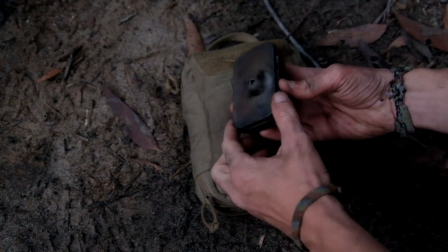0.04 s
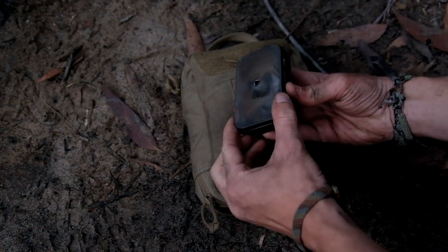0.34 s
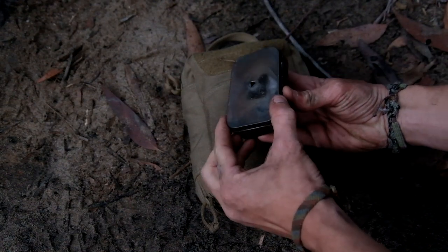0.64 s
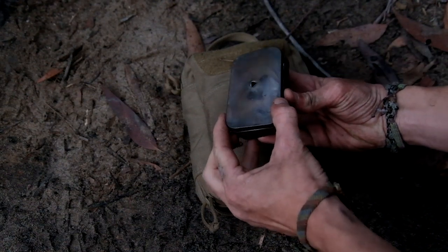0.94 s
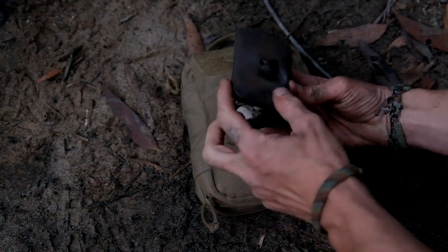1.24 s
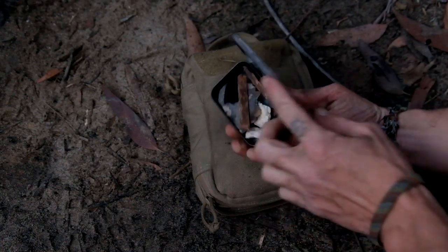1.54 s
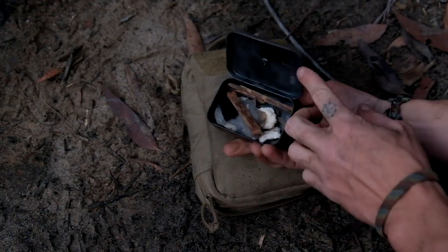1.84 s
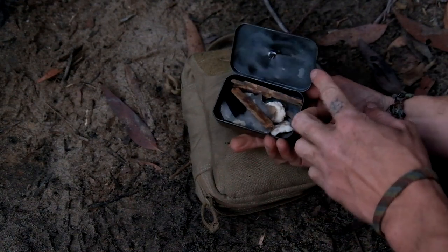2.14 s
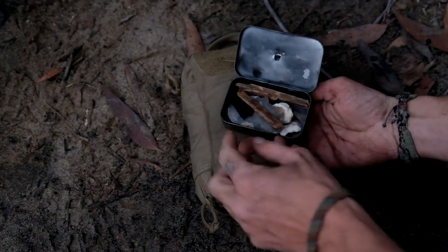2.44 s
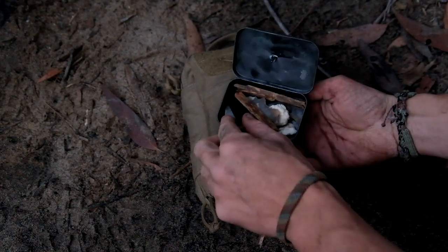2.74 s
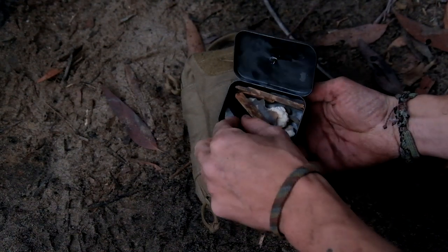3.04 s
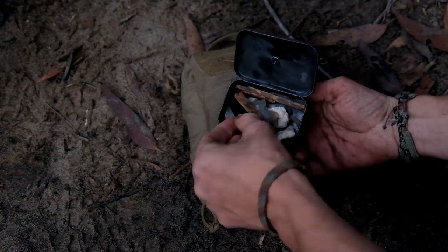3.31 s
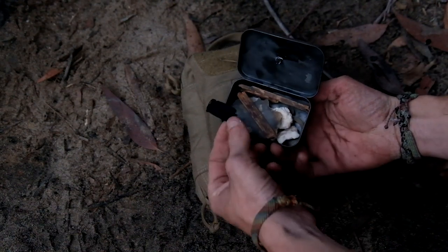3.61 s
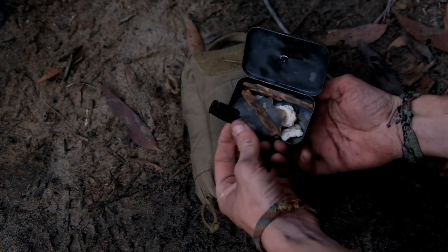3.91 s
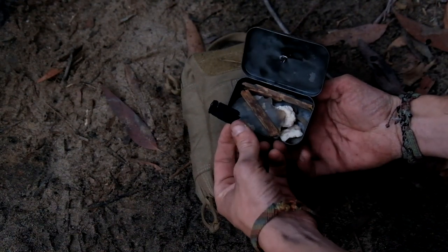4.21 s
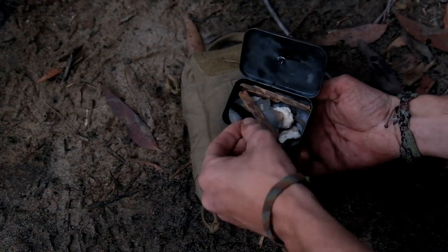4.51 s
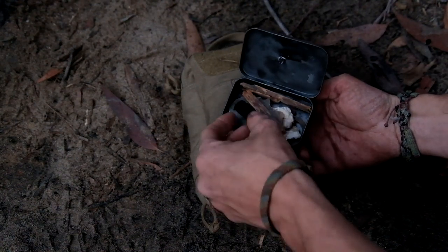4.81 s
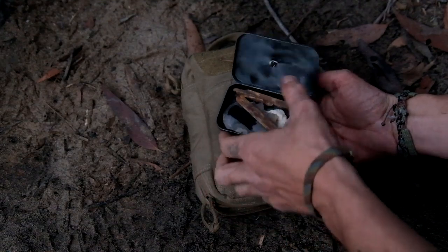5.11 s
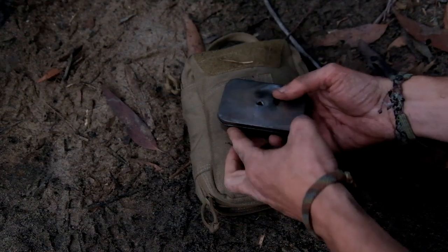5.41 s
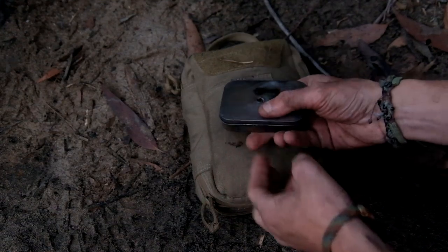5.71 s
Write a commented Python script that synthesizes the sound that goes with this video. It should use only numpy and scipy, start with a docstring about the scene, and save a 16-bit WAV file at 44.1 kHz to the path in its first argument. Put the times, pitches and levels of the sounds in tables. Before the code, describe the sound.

A small hinged tin knocks open with a brief squeak, its contents softly scrape and clink, and the lid clacks closed.

```python
"""Small tinder tin, opened and shut

Outdoors, close on one microphone: almost no echo, a very still background. Fingers tap round a metal
tin and prise up its hinged lid, which knocks, grinds free with a brief squeal and swings open. They pick
among the dry sticks and tinder, then the lid is clapped down and pressed home in a run of clacks.
Every knock and rub rings the same thin shell, damped by the hands."""
import sys
import numpy as np
from scipy import signal
from scipy.fft import rfft, irfft
from scipy.io import wavfile
from scipy.ndimage import uniform_filter1d

SR = 44100
rng = np.random.default_rng(int(sys.argv[2]) if len(sys.argv) > 2 else 0)


def to_wav(sig):
    """Store sig (one row per channel, or 1-D mono) as 16-bit WAV at the path in sys.argv[1].

    Samples outside -1..1 are clipped; the rate is SR.
    """
    pcm = np.clip(np.atleast_2d(sig), -1, 1) * 32767
    pcm = np.round(pcm).astype(np.int16)
    wavfile.write(sys.argv[1], SR, pcm.T)  # frames by channels


N = 253575
TIME = np.arange(N) / SR
LID_OFF_S, LID_ON_S = 1, 5.385
OPEN_T60_S, SHUT_T60_S = 0.079, 0.025


def tin_response(t60, ring_db, vary_db, scatter_db, scatter_t60, detune=0.032):
    """The tin's answer to one tap: a crack, modes set by spot and grip, and scatter off the ground."""
    # modes of the hand-held tin: f/Hz, relative level/dB
    tin_modes = [(635, -1), (742, -0.5), (872, 1.5), (985, 2.5), (1162, -15), (1281, -12.5), (1453, -12),
                 (1566, -13.5), (1701, -5.5), (1878, -1), (1954, 6), (2260, 1), (2524, 7), (3036, 6),
                 (3908, -5.5), (4317, -2), (4586, -2.5), (5496, 2), (5824, 1), (6357, 12), (8220, 3),
                 (8672, -1), (11089, 3.5), (12333, 2)]
    t = TIME[:SR // 8]
    hz, db = np.transpose(tin_modes)
    hz = hz * (1 + detune * rng.standard_normal(len(hz)))
    strength = from_db(db + ring_db + vary_db * rng.standard_normal(len(hz)))
    strength *= rng.choice([-1, 1], len(hz))
    modes = strength @ np.sin(2 * np.pi * hz[:, None] * t) * from_db(-60 * t / t60)
    scatter = rng.standard_normal(len(t)) * from_db(scatter_db - 60 * t / scatter_t60)
    return (t == 0) + modes + scatter * (1 - np.exp(-t / .004))


def contact(s, pitch_hz, grind_s, thud_db, bottom_db, edge_db, tick_db):
    """A touch and a grind (decay capped at 22 ms); grip sets the pitch, hardness the treble."""
    t = TIME[:SR // 6]
    grind_s = np.clip(grind_s, 1e-4, .022)
    slips = grit(len(t), per_s=21000, spread_db=4.5) * np.exp(-t / grind_s) * (1 - np.exp(-t / 0.0011))
    force = from_db(-4.5) * (t == 0) + 65 * grind_s * slips
    if is_open(s) > .5:
        answer = tin_response(OPEN_T60_S, ring_db=-46.5, vary_db=3.5, scatter_db=-47.5, scatter_t60=.17)
    else:  # the lid clamps the rim and shortens the ring
        answer = tin_response(SHUT_T60_S, ring_db=-41.5, vary_db=3.5, scatter_db=-47.5, scatter_t60=.06)
    shell = signal.fftconvolve(force, answer)[:len(t)]
    # a soft pad stirs a narrow register of the shell, a hard rim a wider one
    width = np.interp(edge_db, [-22, -6], [1.28, 1.36])
    body = burst_one(band(band(shell, pitch_hz / width, pitch_hz * width), 500, 2500, order=3))
    # the flat bottom joins in, pushed inward or outward
    bottom = rng.choice([-1, 1]) * burst_one(band(shell, 570, 920, order=3))
    thud = burst_one(band(force, 170, 380))  # the push on the hands
    # metal on metal adds a hard edge and a bright tick
    edge = burst_one(band(shell, 2550, 4950, order=4))
    tick = burst_one(band(shell, 7000, 8900) + from_db(-7.5) * band(shell, 10200, 17000))
    # each part has its own trim in the mix
    lows = from_db(-1.32) * body + from_db(bottom_db) * bottom + from_db(thud_db - 4.5) * thud
    return lows + from_db(edge_db - 3.43) * edge + from_db(tick_db - 2.5) * tick


def lid_knocks():
    """The lid strikes and grinds on the rim, coming off and going home."""
    # lid on rim: t/s, level/dB, f/Hz, grind/s, relative thud/dB, relative edge/dB
    knocks = [(0.9914, -14.5, 1384, .004, -14.5, -7.5), (0.999, -19, 1690, 0.016, -32, -8),
              (1.014, -18, 1500, 0.0035, -35, -6), (1.025, -11.5, 1500, 0.0077, -22, -10.5),
              (1.036, -15, 1651, 0.0055, -33, -4), (5.361, -29.5, 1450, 0.013, -3.5, -6.5),
              (5.377, -13, 1290, 0.0027, -5.5, -7.5), (5.382, -15, 1037, 0.0016, -15, -39),
              (5.387, -17.5, 1033, 0.007, -40, -14), (5.4902, -27, 1356, 0.0085, -44, -13.5),
              (5.54, -34.5, 1340, 0.0043, -27, -17), (5.602, -30.5, 1190, 0.013, -19, -15),
              (5.61, -17.5, 1000, 0.006, -31, -12.5), (5.633, -19, 1290, 0.028, -26, -8),
              (5.643, -15, 1350, 0.0021, -20, -5.5), (5.652, -13, 920, 0.00092, -26, -20),
              (5.669, -10.5, 1550, .0022, -11, -10), (5.7008, -19, 1310, 0.0018, -26, 0.5),
              (5.7218, -18, 1930, 0.0017, -30, -6)]
    out = np.zeros(N)
    for s, db, pitch_hz, grind_s, thud_db, edge_db in knocks:
        tick_db = 0.5 + 1.9 * edge_db  # the tick grows faster than the edge
        knock = contact(s, pitch_hz, grind_s, thud_db, bottom_db=-17, edge_db=edge_db, tick_db=tick_db)
        add(out, s, from_db(db) * knock)
    return out


def finger_taps():
    """Soft fingertips tap and shift on the shut tin, low and boxy."""
    # finger on tin: t/s, level/dB, f/Hz, grind/s, relative edge/dB
    taps = [(0.001, -31.5, 865, 0.01, -18.5), (0.1425, -37.5, 780, .006, -42),
            (0.156, -33, 840, 0.016, -31), (0.182, -42.5, 790, 0.0038, -15), (0.21, -45.5, 900, 0.003, -22),
            (0.246, -43, 836, 0.0045, -24), (0.288, -50, 1010, 0.011, -3), (0.318, -44, 786, 0.012, -27.5),
            (0.36, -41.5, 694, 0.012, -33), (0.3893, -32.5, 930, .013, -26.5),
            (0.409, -26.5, 828, .008, -11.5), (0.417, -12, 770, 0.0015, -34.5),
            (0.43, -30.5, 947, .007, -13.5), (0.527, -45, 920, 0.01, -16.5),
            (0.6, -40.5, 1040, 0.0043, -20), (0.621, -48.5, 1020, 0.0029, -10.5),
            (0.7, -47.5, 890, 0.0027, -24), (0.794, -37, 1080, 0.0074, -14),
            (0.823, -34.5, 935, 0.0066, -19)]
    out = np.zeros(N)
    for s, db, pitch_hz, grind_s, edge_db in taps:
        tap = contact(s, pitch_hz, grind_s, thud_db=-25.5, bottom_db=-12,
                      edge_db=edge_db, tick_db=edge_db - 5.5)
        add(out, s, from_db(db) * tap)
    return out


def hinge_catches(pitch_hz=1916):
    """The hinge catches as the lid swings, and each catch sounds the shell."""
    # catches: t/s, level/dB, grind/s, relative edge/dB
    catches = [(1.093, -34.5, 0.0021, -16), (1.147, -52, 0.0042, -6), (1.245, -37.5, 0.0023, -25.5),
               (1.301, -40.5, 0.0013, -33), (1.41, -39, 0.0031, -11), (1.446, -42.5, 0.013, -2),
               (1.606, -37.5, 0.0038, -2.5), (1.771, -43, 0.0055, -3), (1.903, -47, 0.0056, -1.5),
               (1.959, -50, 0.0057, -3), (2.07, -40.5, 0.0046, -8.5), (5.202, -42, 0.0053, 2.5),
               (5.2088, -37.5, .002, -4), (5.316, -40.5, 0.0019, 8), (5.338, -36, 0.015, -6)]
    out = np.zeros(N)
    for s, db, grind_s, edge_db in catches:
        catch = contact(s, pitch_hz, grind_s, thud_db=-23.5, bottom_db=-14, edge_db=edge_db, tick_db=-25)
        add(out, s, from_db(db) * catch)
    return out


def stick_nudges():
    """Sticks and tinder nudge the wall from inside."""
    # nudges: t/s, level/dB, f/Hz, grind/s, relative edge/dB
    nudges = [(2.716, -50.5, 1440, 0.008, -3.5), (2.744, -51, 1680, 0.0067, -2),
              (2.79, -54.5, 1634, 0.0041, -1.5), (2.907, -38.5, 1364, 0.007, -10.5),
              (2.928, -35, 1510, 0.02, -10.5), (2.9548, -29, 1520, 0.0025, -10.5),
              (3.056, -42, 1790, 0.0069, -7), (3.086, -41.5, 1500, 0.017, -7.5),
              (3.208, -37, 1660, .006, -12.5), (3.3897, -44, 1620, 0.0093, -6),
              (3.467, -51, 1430, 0.0034, -17), (3.675, -39.5, 1630, .011, -7),
              (3.75, -42, 1700, 0.0086, -5), (3.797, -45.5, 1820, .005, -8),
              (4.629, -42.5, 1770, .0054, -11), (4.71, -41.5, 1520, 0.013, -7.5),
              (4.737, -38, 1500, 0.011, -3.5), (4.792, -26.5, 1740, 0.0018, -6)]
    out = np.zeros(N)
    for s, db, pitch_hz, grind_s, edge_db in nudges:
        nudge = contact(s, pitch_hz, grind_s, thud_db=-36, bottom_db=-25, edge_db=edge_db, tick_db=-24.5)
        add(out, s, from_db(db) * nudge)
    return out


def clinks(crack_db=-9, crack_s=0.0013):
    """A small hard piece drops against the wall with a crack; no hand damps it, so it rings clear."""
    # landings: t/s, level/dB
    landings = [(3.389, -30), (3.4056, -44), (3.412, -42), (5.702, -36.5)]
    # modes of the piece: f/Hz, relative level/dB, t60/s
    piece_modes = [(1362, -12, .11), (2514, -2, .05), (2579, -6, .065), (6363, -8, .075), (10990, -10, .04),
                   (11400, -13, .025)]
    out, t = np.zeros(N), TIME[:SR // 5]
    ring = sum(from_db(db - 60 * t / t60) * np.sin(2 * np.pi * hz * t) for hz, db, t60 in piece_modes)
    ring *= 1 - np.exp(-t / 0.00016)
    for s, db in landings:
        crack = burst_one(band(rng.standard_normal(len(t)) * np.exp(-t / crack_s), 6430, 15000))
        add(out, s, from_db(db) * (ring + from_db(crack_db) * crack))
    return out


def rim_squeal(roughness=0.43):
    """Stick and slip drives high modes of the rim as the lid slides off."""
    # rise and fall of the squeal: t/s, level/dB
    contour = [(1.015, -78), (1.028, -43), (1.036, -29), (1.043, -28), (1.052, -28), (1.066, -39),
               (1.078, -46), (1.10, -83.5)]
    # partials of the rim: f/Hz, relative level/dB
    partials = [(8216, 0.5), (8290, -15.5), (12338, -23.5)]
    s, db = np.transpose(contour)
    sliding = (TIME > s[0]) & (TIME < s[-1])
    waver = 1 + roughness * rms_one(band(rng.standard_normal(N), 30, 250))
    return sliding * from_db(np.interp(TIME, s, db)) * waver * tones(partials)


def rubbing(clump_db=3.5, attack_s=0.02, release_s=0.028):
    """Skin, hinge and tinder slide along the tin; dense small slips keep the shell sounding."""
    # strokes: start t/s, end t/s, level/dB, relative edge/dB, relative hiss/dB
    strokes = [(0.0, 0.104, -66.5, -3.5, -10), (0.118, 0.234, -63, -8, -11), (0.58, 0.79, -64, -11.5, -11),
               (0.797, 0.837, -52, -5, -13.5), (1.028, 1.068, -41, -5, -8.5),
               (1.127, 1.233, -59.5, -6.5, -17), (1.229, 1.398, -53.5, 0, -10.5),
               (1.416, 1.656, -57.5, 3.5, -2), (1.666, 1.881, -59.5, 1.5, -17),
               (1.9, 2.14, -62.5, 0, -12.5), (2.716, 2.885, -67.5, 1, -16), (2.902, 3.115, -66, -1, -19),
               (3.132, 3.332, -70, -3, -20), (3.39, 3.434, -56, -7, -13), (3.668, 3.878, -65, 0.5, -16.5),
               (4.453, 4.578, -76.5, -7.5, -16.5), (4.6, 4.764, -54, -2, -12.5),
               (4.95, 5.042, -71.5, 2, -12.5), (5.043, 5.31, -60.5, 5, -5),
               (5.304, 5.395, -41.5, -6.5, -12.5), (5.445, 5.587, -46, -4, -12.5),
               (5.597, 5.674, -31, -14, -22)]
    shell, window = np.zeros(N), np.sqrt(np.hanning(SR // 8))
    # the rubbing wanders from spot to spot, each with its own mix of modes
    for s in TIME[::len(window) // 2]:
        answer = tin_response(OPEN_T60_S, ring_db=-52, vary_db=7.5,
                              scatter_db=-44.5, scatter_t60=0.072, detune=0.019)
        slips = window * grit(len(window), per_s=1400, spread_db=0.5)
        add(shell, s, signal.fftconvolve(slips, answer))
    # a steady push on average, with the slips coming in clumps
    shell /= np.sqrt(uniform_filter1d(shell ** 2, size=2200) + 1e-9)
    shell *= from_db(clump_db * drift(130))
    # shut, the tin sounds low and boxy; open, it sounds higher
    low_register = rms_one(band(shell, 600, 1180, order=3))
    high_register = rms_one(band(shell, 1450, 1980))
    shut_body = low_register - from_db(-4.5) * high_register
    open_body = high_register - from_db(-10) * low_register
    body = is_open(TIME) * open_body + (1 - is_open(TIME)) * shut_body
    edge = from_db(-3) * rms_one(band(shell, 2500, 5000, order=4))
    hiss = from_db(-0.5) * rms_one(band(band(shell, 6500, 17000, order=3), 7400, 9400, order=1))
    out = np.zeros(N)
    for start_s, end_s, db, edge_db, hiss_db in strokes:
        push = np.clip((TIME - start_s) / attack_s, 0, 1)
        push *= np.exp(-np.maximum(TIME - end_s, 0) / release_s)
        out += from_db(db) * push * (body + from_db(edge_db) * edge + from_db(hiss_db) * hiss)
    return out


def brushes(clump_db=-2.5):
    """A finger or cuff drawn over an edge gives a short, dry, grainy hiss."""
    # brush strokes: t/s, rise/s, fall/s, level/dB, centre f/Hz, relative hiss/dB
    strokes = [(1.561, 0.0029, 0.022, -41.5, 3330, -5.5), (1.578, 0.0039, 0.0043, -50, 3850, 14),
               (1.61, 0.0058, 0.011, -47, 3440, 0.5), (4.738, 0.0046, 0.0065, -51, 4830, -25),
               (5.115, 0.0075, 0.0085, -54.5, 4300, -2), (5.138, 0.014, 0.011, -48, 4280, -9.5),
               (5.306, .018, 0.012, -47.5, 4950, -39)]
    fibres = grit(N, per_s=26000, spread_db=-17.5) * from_db(clump_db * drift(300))
    hiss = rms_one(band(fibres, 7400, 11400))
    out = np.zeros(N)
    for s, rise_s, fall_s, db, centre_hz, hiss_db in strokes:
        envelope = np.exp(-.5 * ((TIME - s) / np.where(TIME < s, rise_s, fall_s)) ** 2)
        swish = rms_one(band(fibres, centre_hz / 1.4, centre_hz * 1.35))
        out += from_db(db) * envelope * (swish - from_db(hiss_db) * hiss)
    return out


def background(air_db=-67.5, hum_rest_db=-78):
    """Still air and microphone hiss, a faint hollow hum and a trace of whine."""
    # spectrum of the air and hiss: f/Hz, relative level/dB
    air_spectrum = [(12, -31), (20, -2.5), (86, -3), (127, -6.5), (216, -8.5), (270, -16), (310, -8),
                    (446, -5.5), (485, -6), (1090, -12), (4180, -18), (13900, -20.5), (16000, -20.5)]
    # the hum swells while the hands shift: t/s, half length/s, level/dB
    swells = [(0.2, 0.43, -76), (1.57, 0.16, -64), (3.65, 0.23, -75), (4.53, 0.05, -59),
              (4.75, 0.069, -65.5), (4.98, 0.061, -59.5)]
    # thin steady whine: f/Hz, level/dB
    whine = [(8728, -88.5), (11130, -89)]
    hz, air_shape_db = np.transpose(air_spectrum)
    bins_hz = np.maximum(np.arange(N // 2 + 1) * SR / N, 1)
    colour = from_db(np.interp(np.log(bins_hz), np.log(hz), air_shape_db))
    air = rms_one(irfft(rfft(rng.standard_normal(N)) * colour, N))
    swell = sum(from_db(db) * np.exp(-.5 * ((TIME - s) / half_s) ** 2) for s, half_s, db in swells)
    hum = (from_db(hum_rest_db) + swell) * rms_one(band(rng.standard_normal(N), 280, 338))
    return from_db(air_db) * air + hum + tones(whine)


def is_open(s):
    """1 while the lid is off, 0 while it is on."""
    return np.interp(s, [LID_OFF_S, LID_OFF_S + 0.04, LID_ON_S - .02, LID_ON_S], [0, 1, 1, 0])


def grit(count, per_s, spread_db):
    """Tiny slips of uneven size at random moments; rms 1."""
    slips = (rng.random(count) < per_s / SR) * rng.choice([-1, 1], count)
    return rms_one(slips * from_db(spread_db * np.clip(rng.standard_normal(count), -2, 2)))


def drift(per_s):
    """A random wander with spread near 1."""
    knots = rng.standard_normal(2000)
    return np.interp(TIME * per_s, np.arange(len(knots)), knots)


def tones(partials):
    """Steady sines from rows of f/Hz, rms level/dB."""
    return sum(from_db(db) * np.sqrt(2) * np.sin(2 * np.pi * hz * TIME) for hz, db in partials)


def from_db(db):
    """Decibels to gain."""
    return 10 ** (np.asarray(db) / 20)


def rms_one(x):
    """Scale to rms 1."""
    return x / np.sqrt(np.mean(x ** 2) + 1e-20)


def burst_one(x):
    """Scale to the energy of 10 ms at rms 1."""
    return x / np.sqrt(np.sum(x ** 2) / (SR / 100) + 1e-20)


def band(x, low_hz, high_hz, order=2):
    """Causal band-pass."""
    return signal.sosfilt(signal.butter(order, [low_hz, high_hz], "band", fs=SR, output="sos"), x + 1e-18)


def add(out, s, sound):
    """Mix a sound in at time s."""
    i = max(0, round(s * SR))
    out[i:i + len(sound)] += sound[:max(0, N - i)]


def scene():
    """The tin in the hands, close to one microphone in the open air."""
    contacts = finger_taps() + lid_knocks() + hinge_catches() + stick_nudges()
    return (contacts + clinks() + rim_squeal() + rubbing() + brushes() + background())[None]


def record(dry, cutoff_hz=15800):
    """The recorder rounds the tallest peaks and cuts the extreme top."""
    rounded = 1.338 * np.tanh(dry / 1.409)
    return signal.sosfilt(signal.ellip(10, .1, 70, cutoff_hz, fs=SR, output="sos"), rounded)


dry = scene()
out = record(dry)
to_wav(out)
```